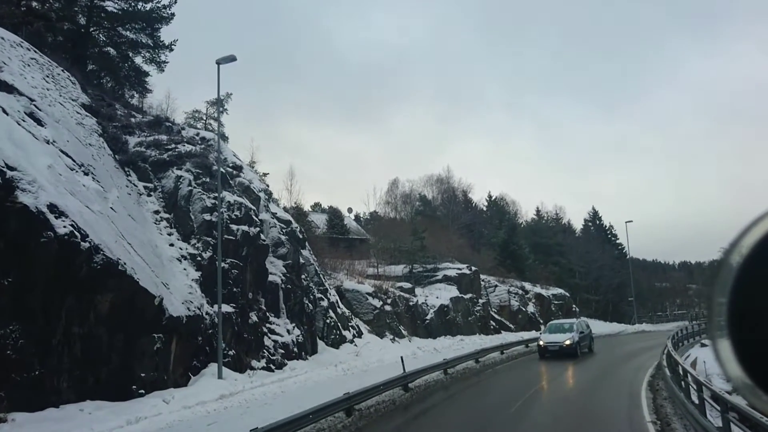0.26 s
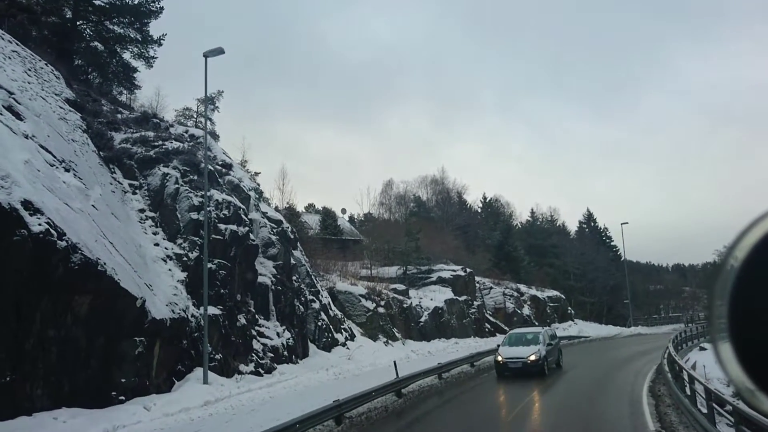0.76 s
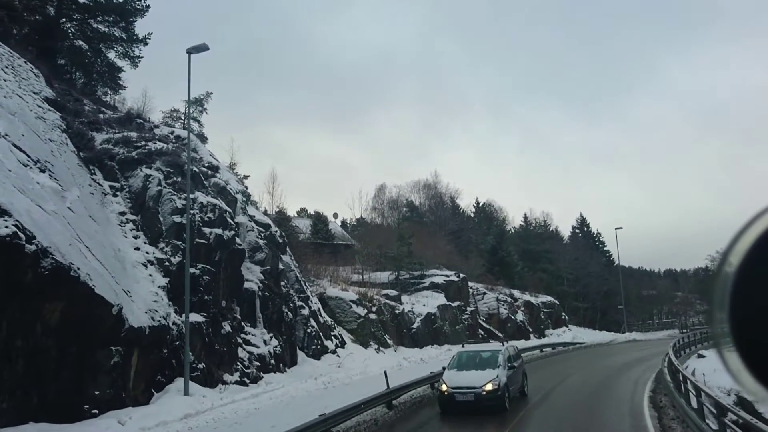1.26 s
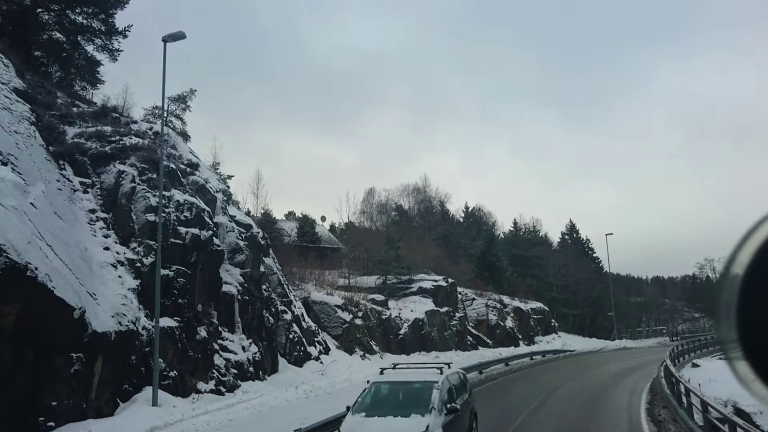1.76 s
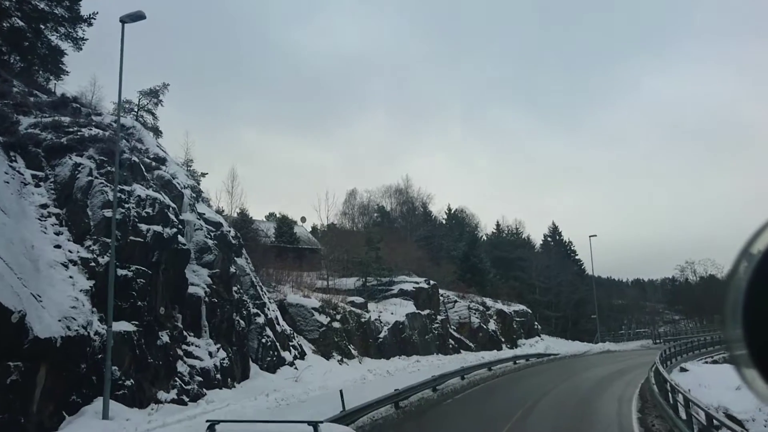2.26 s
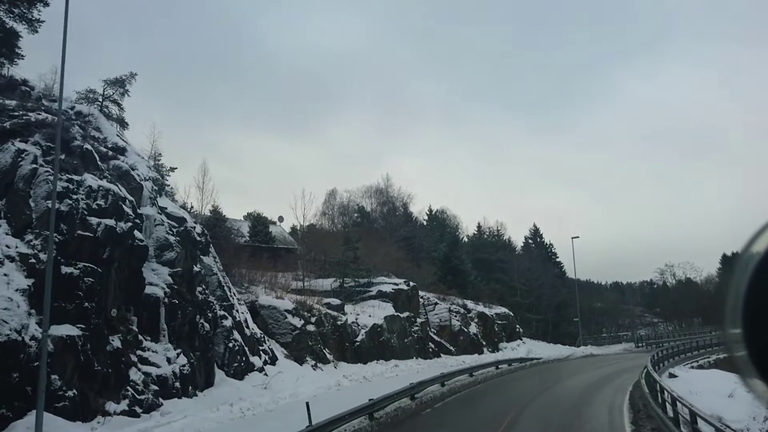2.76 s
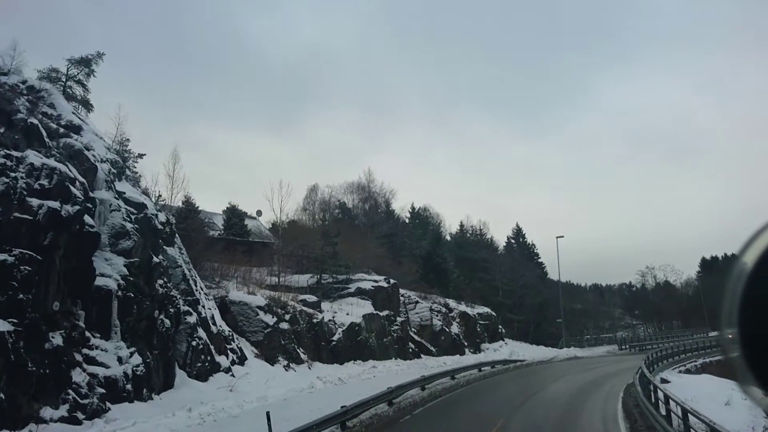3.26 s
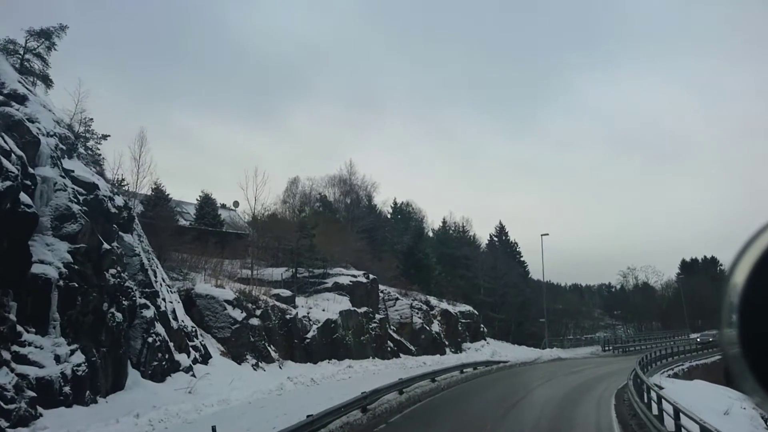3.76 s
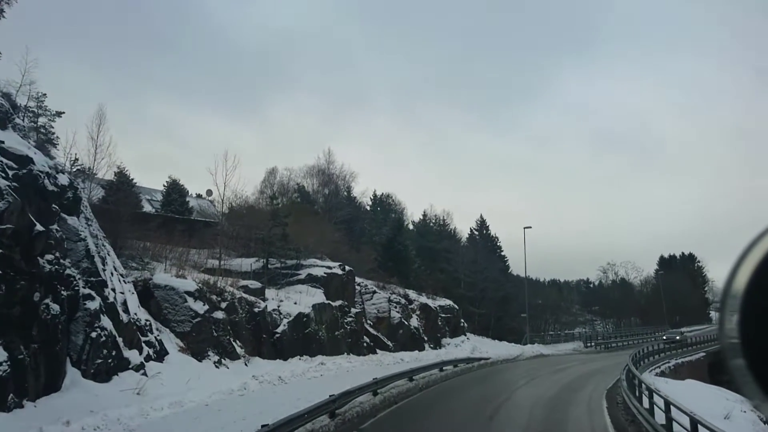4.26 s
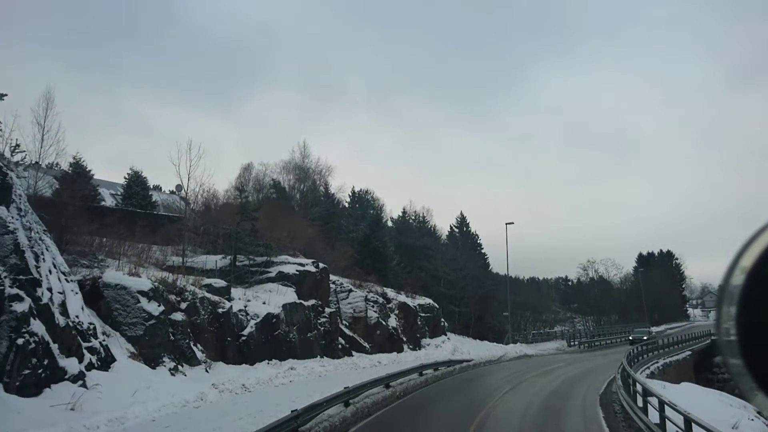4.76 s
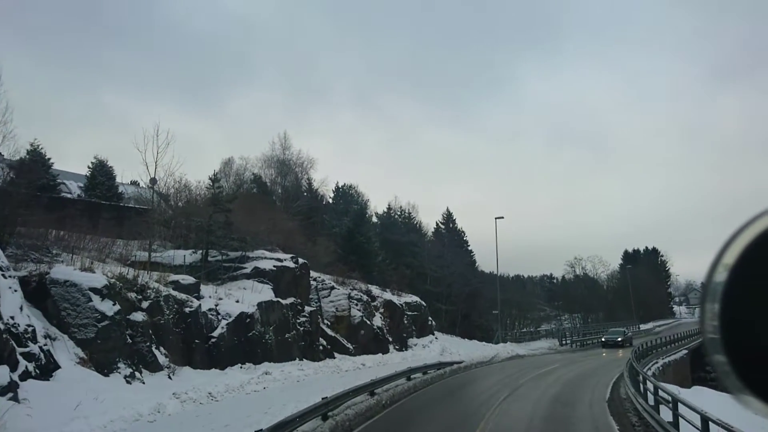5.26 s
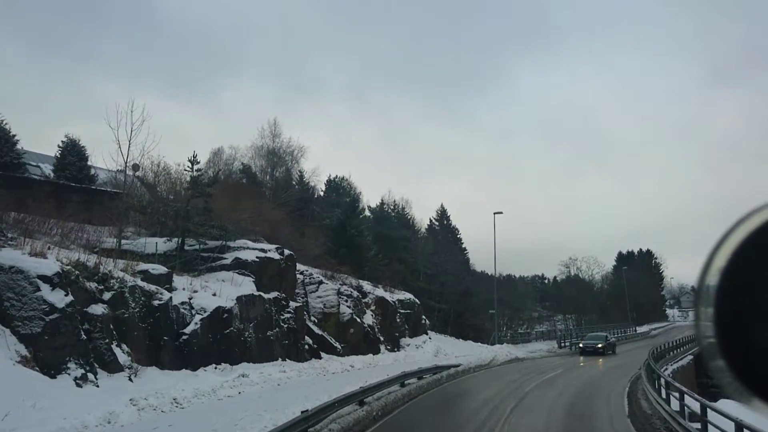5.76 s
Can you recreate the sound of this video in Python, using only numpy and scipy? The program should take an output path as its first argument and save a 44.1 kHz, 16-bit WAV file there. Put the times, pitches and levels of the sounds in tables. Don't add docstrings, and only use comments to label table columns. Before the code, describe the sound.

Deep booming truck engine climbs, drops and climbs again in the cab, with blower air, tyre hiss, one passing car and plastic clicks.

```python
import sys
import numpy as np
from scipy import signal
from scipy.fft import rfft, irfft, next_fast_len
from scipy.io import wavfile
from scipy.ndimage import uniform_filter1d

SR = 44100
rng = np.random.default_rng(int(sys.argv[2]) if len(sys.argv) > 2 else 0)


def int16_out(signal):
    q = np.round(np.clip(np.atleast_2d(signal).T, -1, 1) * 32767)
    wavfile.write(sys.argv[1], SR, q.astype(np.int16))


def gain_from_decibels(decibels):
    exponent = np.asarray(decibels, float) / 20
    return 10 ** exponent


N = 265482
T = np.arange(N) / SR
LAG = 19 / SR
FULL_DB = -33


def evened(x):
    return x / np.sqrt(np.mean(x ** 2) + 1e-20)


def read(points, hz, axis=1):
    rows = np.array(points)
    return np.interp(np.log(hz + 1), np.log(rows[:, 0] + 1), rows[:, axis])


def curve(rows, axis=1):
    rows = np.array(rows)
    return np.interp(T, rows[:, 0], rows[:, axis])


def hump(at_s, length_s):
    return np.exp(-((T - at_s) / np.maximum(length_s, .01)) ** 2)


def wander(per_s, count, t=T):
    curve_rate = 200
    steps = rng.standard_normal((int(6.1 * curve_rate), count))
    smoother = signal.butter(2, np.clip(per_s, .3, 60) / (curve_rate / 2))
    steps = signal.lfilter(*smoother, steps, axis=0)
    return [np.interp(t, np.arange(len(s)) / curve_rate, evened(s)) for s in steps.T]


# (frequency [Hz], likeness [0-1], left minus right [dB])
PORTS = [(60, 1, -6.5), (173, 0.58, -5), (280, 0.94, -0.5), (420, 0.73, 0), (616, 0.52, 0.5),
         (950, 0.043, -5.5), (1350, 0.65, -4), (1690, 0.77, -5), (2050, 0.25, -10), (2640, 0.073, -6.5),
         (3770, 0.13, -3.5), (4530, 0.16, -7), (5900, 0.057, 1.5), (9100, 0.15, -2.5)]


def port_tilt_db(hz):
    return np.outer([.5, -.5], read(PORTS, hz, axis=2))


# (frequency [Hz], width [Hz], left level [dB], right level [dB])
CAB = [(330.5, 23, 5, 10.5), (358, 98, 0, 3), (578, 21.4, 6, 7.5), (698, 47, 0, 5.5), (965, 90, 8.5, 5),
       (1100, 170, -1, -2), (1240, 20, 1.5, 4), (1594, 400, 0, -2.5), (2040, 130, 9.5, -3),
       (2470, 210, 6.5, 1.5), (2996, 49, 11, 2), (6990, 830, -0.5, -1)]


def cab_db(shape, hz):
    tint_db = sum(np.outer([left_db, right_db], 1 / (1 + (2 * (hz - f) / width) ** 2))
                  for f, width, left_db, right_db in CAB)
    return tint_db + port_tilt_db(hz) + read(shape, hz)


def cab_noise(shape, patchy_db, size=2048):
    hop, hz = size // 4, np.fft.rfftfreq(size, 1 / SR)
    a, b, c, d, patches = rng.standard_normal((N // hop + 5, len(hz), 5)).T
    patches = uniform_filter1d(patches, size=size // 100, axis=0)
    patches = evened(uniform_filter1d(patches, size=4, axis=1))
    like = np.clip(read(PORTS, hz), 0, 1)[:, None]
    right = a + 1j * b
    early = np.exp(2j * np.pi * hz * LAG)[:, None]
    left = like * right * early + np.sqrt(1 - like ** 2) * (c + 1j * d)
    z = np.array([left, right]) * gain_from_decibels(cab_db(shape, hz)[:, :, None] + patchy_db * patches)
    return evened(signal.istft(z, nperseg=size, noverlap=size - hop)[1][:, :N])


def at_ports(turns, hz, pan_db):
    phases = np.array([turns + hz * LAG, turns])
    return np.sin(2 * np.pi * phases) * gain_from_decibels(np.outer([.5, -.5], pan_db)) * np.sqrt(2)


# (frequency [Hz], width [Hz], level [dB])
FAN_MODES = [(404.3, 30, -1.5), (603, 72, -14), (729, 23, -1.5), (1010, 49, -16.5), (1284, 14, -0.5),
             (1673, 130, -14)]


def blower():
    size = next_fast_len(N)
    hz = np.fft.rfftfreq(size, 1 / SR)
    ducts = sum(gain_from_decibels(db) / (1 + (2 * (hz - f) / width) ** 2) for f, width, db in FAN_MODES)
    ducts = ducts * gain_from_decibels(port_tilt_db(hz)) * np.exp(2j * np.pi * np.outer([LAG, 0], hz))
    air = rfft(rng.standard_normal(size))
    return gain_from_decibels(-51) * evened(irfft(air * ducts, size)[:, :N])


# (frequency [Hz], level [dB])
HISS = [(400, -14), (900, -14.5), (1700, -2.5), (2500, -11.5), (3300, -15), (4600, -12.5), (5500, -15.5),
        (7200, -19), (8500, -24), (9700, -38.5), (11000, -40), (13500, -60.5)]
# (frequency [Hz], level [dB])
SPRINGS = [(15, -21), (28, -2), (45, 1), (70, -7), (200, -61.5), (600, -110)]
# (densest time [s], length [s], level [dB])
SPRAY = [
    (1.18, .15, -62),
    (3.14, 0.38, -47.5),
    (5.0, 0.57, -57),
    (5.8, .4, -57),
]


def road():
    pull_away_s, gather_s, crawl = 0.51, 5, 0.28
    speed = 1 - (1 - crawl) * np.exp(-np.maximum(T - pull_away_s, 0) / gather_s)
    effort_db = curve(ENGINE, axis=2) - FULL_DB
    tyres_db = -50.5 + 25 * np.log10(speed) + 0.19 * effort_db
    spray = sum(gain_from_decibels(db) * hump(s, length) for s, length, db in SPRAY)
    level = np.hypot(gain_from_decibels(tyres_db), spray)
    flutter = gain_from_decibels(.5 * wander(12.0, count=1)[0])
    hiss = level * flutter * cab_noise(HISS, patchy_db=1.5, size=1024)
    return hiss + gain_from_decibels(-57) * cab_noise(SPRINGS, patchy_db=1, size=8192)


# (frequency [Hz], level [dB])
CAR_COLOUR = [(250, -25.5), (500, -5.5), (1000, -3.5), (1600, -3.5), (2300, -12.5), (3200, -15.5),
              (5000, -23), (7000, -28), (8800, -38), (9800, -58), (13500, -57.5)]
# (nearest time [s], closing time [s], leaving time [s], level [dB])
CAR_PASS = (3.03, 0.17, 0.17, -37)


def car():
    near, closing, leaving, db = CAR_PASS
    away = (T - near) / np.where(T < near, closing, leaving)
    return gain_from_decibels(db) / (1 + away ** 2) ** .8 * cab_noise(CAR_COLOUR, patchy_db=1, size=1024)


# (time [s], peak level [dB], low modes [dB], left minus right [dB], share of dry snap [0-1])
TICKS = [(1.039, -57, -10, -5, .4), (1.117, -42, -12, -7, .35), (1.179, -44, -4, -3, .45),
         (1.213, -50, 14, -5, .2), (2.281, -58, 3, -3, .4), (2.878, -25, 0, -9, .6), (3.62, -56, 3, -2, .3),
         (3.834, -43, -4, -6, .2), (4.328, -48, 8, -4, .2), (4.542, -47, -6, -4, .4),
         (4.659, -35, 1, -7, .1)]
# (frequency [Hz], level [dB], 60 dB decay time [s])
TRIM = [(2900, -3, .012), (3500, 0, .015), (4500, -6, .01), (5850, 1, .018), (6400, -6, .012),
        (7200, -7, .016), (8000, -7, .014), (9000, -15, .01), (10300, -24, .008)]
# (frequency [Hz], level [dB])
SNAP = [(1500, -24), (2600, 3), (4000, -1), (6300, -6), (7500, -19), (10500, -24), (12000, -35),
        (14000, -40)]
# (time [s], level [dB], frequency [Hz], 60 dB decay time [s], left minus right [dB])
PING = (3.661, -34, 1255, .16, -6)


def dry_snaps(t):
    bursts = rng.standard_normal((len(TICKS), len(t))) * np.exp(-t / .0012)
    bursts[:, 40] += 9
    colour = gain_from_decibels(read(SNAP, np.fft.rfftfreq(len(t), 1 / SR)))
    return irfft(rfft(bursts) * colour, len(t))


def plastic_ring(t, low_db, draw):
    ring = 0
    for (f, db, t60), (u, v, w) in zip(TRIM, draw):
        level = gain_from_decibels(db + low_db * (f < 5000) + 3 * u - 60 * t / t60)
        ring = ring + level * np.sin(2 * np.pi * (f * (.985 + .03 * v) * t + w))
    return ring


def trim():
    out, t = np.zeros((2, N + SR)), np.arange(SR // 4) / SR
    chance = rng.random((len(TICKS), len(TRIM), 3))
    sounds = []
    for (s, db, low_db, pan_db, dry_share), draw, snap in zip(TICKS, chance, dry_snaps(t)):
        ring = plastic_ring(t, low_db, draw)
        tick = (1 - dry_share) * evened(ring) + dry_share * evened(snap)
        tick = tick * (1 - np.exp(-t / .0003)) * (t < .1)
        sounds.append((s, gain_from_decibels(db) * tick / abs(tick).max(), pan_db, LAG / 8))
    s, db, f, t60, pan_db = PING
    ping = gain_from_decibels(db - 60 * t / t60) * np.sin(2 * np.pi * f * t) * (1 - np.exp(-t / .004))
    sounds.append((s, ping, pan_db, LAG / 2))
    for s, sound, pan_db, lag in sounds:
        for port, late in enumerate((-lag, 0)):
            at = round((s + late) * SR)
            out[port, at:at + len(t)] += gain_from_decibels(pan_db * (.5 - port)) * sound
    return out[:, :N]


# (time [s], frequency [Hz], level [dB])
TURBO = [
    (2.2, 4300, -88),
    (2.8, 5720, -72),
    (3.2, 5450, -68),
    (3.7, 5920, -70),
    (4.15, 5350, -77),
    (4.6, 5750, -76),
    (5.1, 6700, -84),
    (5.42, 7200, -82),
    (5.75, 6900, -95),
]


def turbo():
    wobble, flutter = wander(25., count=2)
    hz = curve(TURBO) + 17 * wobble
    on = (T > TURBO[0][0]) & (T < TURBO[-1][0])
    level = gain_from_decibels(curve(TURBO, axis=2) + 4 + 2 * flutter)
    return on * level * at_ports(np.cumsum(hz) / SR, hz, 1.5 + 0 * hz)


# (frequency [Hz], level [dB])
ROAR = [(60, -18), (170, -2), (280, -6), (400, -4.5), (650, -6), (850, -10.5), (1500, -12), (2200, -22),
        (4000, -31.5), (8000, -69.5), (12000, -100.5)]
CYLINDERS = [1, .7, .9, .6, 1, .75]


def knock(turns, uneven=0.53):
    at = np.flatnonzero(np.diff(np.floor(turns)))
    blows = np.zeros(N)
    blows[at] = np.resize(CYLINDERS, len(at)) * (1 + uneven * rng.standard_normal(len(at)))
    log_gain = np.log(gain_from_decibels(cab_db(ROAR, np.abs(np.fft.fftfreq(8192, 1 / SR)))))
    ring = np.fft.ifft(np.exp(signal.hilbert(log_gain).conj())).real[:, :4096]
    shared, *own = rng.standard_normal((3, 3000))
    smear = (shared + .9 * np.array(own)) * np.exp(-np.arange(3000) / (.018 * SR))
    panels = signal.fftconvolve(ring, smear, axes=1)
    left, right = signal.oaconvolve(blows[None], panels, axes=1)[:, :N]
    return evened(np.array([left, np.roll(right, round(LAG * SR))]))


# (frequency [Hz], level [dB])
BOOM = [(25, -31), (55, -4), (80, -3.5), (100, -0.5), (125, 8), (150, -9.5), (185, -12.5), (260, -21.5),
        (420, -22.5), (700, -43), (2000, -100)]
SIXTHS_DB = [3, -9, -4, -1, -3, -9]


def sixth_orders(hz, turns, every=20):
    hz, turns = hz[::every], turns[::every]
    sixths = [k for k in range(8, 50) if k != 12]
    swings, starts = (wander(per_s, count=len(sixths), t=T[::every]) for per_s in (4, 2.5))
    orders = 0
    for k, swing, start in zip(sixths, swings, starts):
        f = hz * k / 6
        level = gain_from_decibels(SIXTHS_DB[k % 6] + read(BOOM, f) + 2.5 * swing)
        phase = turns * k / 6 + .25 * start + .37 * k ** 2
        orders = orders + level * at_ports(phase, f, read(PORTS, f, axis=2))
    orders /= np.sqrt(uniform_filter1d((orders ** 2).mean(0), size=SR // every // 3))
    return signal.resample_poly(orders, every, 1, axis=1)[:, :N]


# (time [s], firing rate [Hz], effort as level of the firing line [dB])
ENGINE = [(0, 29.3, -55), (.74, 29.2, -54), (1, 33.3, -47), (1.42, 37.3, -43), (1.95, 48, -36.5),
          (2.4, 58.2, -35.5), (2.7, 62.5, -32), (2.87, 60.7, -35), (3.02, 54.8, -37), (3.42, 59.6, -33),
          (3.66, 59.6, -33), (3.98, 48.3, -37), (4.3, 53.4, -37), (4.52, 53.8, -36.5), (4.86, 59, -35),
          (5.36, 62.6, -32), (5.74, 50.2, -36.5), (6.02, 54.5, -35)]
# (time [s], length [s], firing line level [dB], octave level [dB])
LURCHES = [(0.128, 0.17, -3, -6), (.55, 0.43, -5, 10), (0.89, .06, 5, 6.5), (1.265, 0.15, -1.5, -12),
           (1.95, 0.24, -0.5, -5.5), (2.353, 0.054, -18, 7.5), (3.057, 0.19, -1.5, 0), (3.216, .05, -21, 7),
           (3.45, 0.014, -2, 3), (3.794, 0.083, -12.5, -15.5), (4.17, .06, -1.5, 3.5),
           (4.388, 0.11, -0.5, -8), (4.66, 0.13, -1, 6), (4.9, 0.05, -6, -1.5), (5.15, 0.15, -1, -8.5),
           (5.457, 0.021, 3, 7.5), (5.537, 0.039, -15, -4), (5.768, 0.079, -0.5, -5)]
# (multiple of firing rate [-], level at full pull [dB])
UPPER = [(1.5, -52), (2.5, -46), (3, -57), (4, -57)]


def engine():
    hz, effort_db = curve(ENGINE), curve(ENGINE, axis=2) - FULL_DB
    turns = np.cumsum(hz) / SR
    line_jolt_db, octave_jolt_db = sum(np.outer([line_db, octave_db], hump(s, length))
                                       for s, length, line_db, octave_db in LURCHES)

    octave_follows = 0.94
    octave_db = -35 + octave_follows * effort_db + 0.23 * read(BOOM, 2 * hz)
    octave_db += wander(6.4, count=1)[0]
    slowing = np.minimum(uniform_filter1d(np.gradient(hz) * SR, size=SR // 10), 0)
    octave_db += 0.1 * slowing

    def line(multiple, db, drift=0):
        f = multiple * hz
        return gain_from_decibels(db) * at_ports(multiple * turns + 0.2 * drift, f, read(PORTS, f, axis=2))

    lines = line(1, FULL_DB + effort_db + line_jolt_db) + line(2, octave_db + octave_jolt_db)
    for (multiple, db), drift in zip(UPPER, wander(2.58, count=len(UPPER))):
        lines = lines + line(multiple, db + octave_follows * effort_db + drift, drift)

    boom = gain_from_decibels(-2.5) * sixth_orders(hz, turns) + gain_from_decibels(-4.5) * cab_noise(BOOM, patchy_db=.5, size=4096)
    boom_db = -34.5 + 0.47 * effort_db + 0.23 * octave_jolt_db
    roar = gain_from_decibels(-6) * knock(turns) + gain_from_decibels(-1) * cab_noise(ROAR, patchy_db=.6)
    roar_db = -40.5 + 0.28 * effort_db + 0.33 * (T - 4)
    return lines + gain_from_decibels(boom_db) * boom + gain_from_decibels(roar_db) * roar


def scene():
    return blower() + road() + car() + trim() + turbo() + engine()


def band_limit(x):
    return signal.sosfilt(signal.butter(12, 13400, fs=SR, output="sos"), x)


def record(dry):
    self_noise = signal.lfilter([.3], [1, -.7], rng.standard_normal(dry.shape)) * gain_from_decibels(-68)
    bass_cut = signal.butter(2, 18, "high", fs=SR, output="sos")
    heard = signal.sosfilt(bass_cut, dry + self_noise)
    return band_limit(heard)


dry = scene()
out = record(dry)
int16_out(out)
```